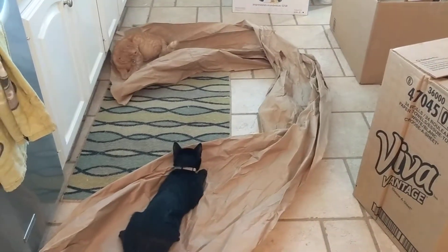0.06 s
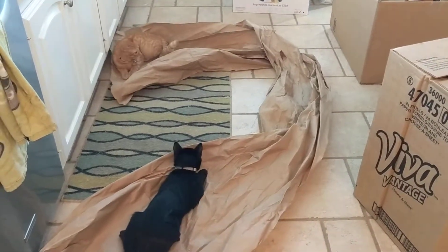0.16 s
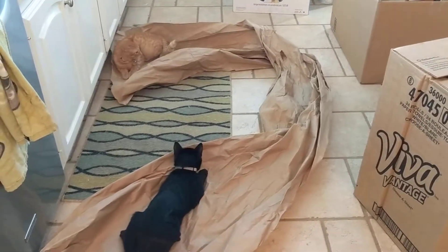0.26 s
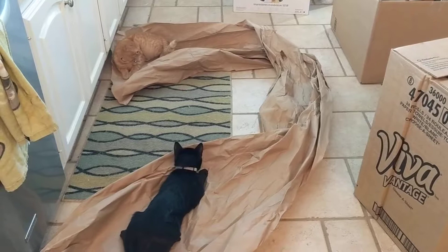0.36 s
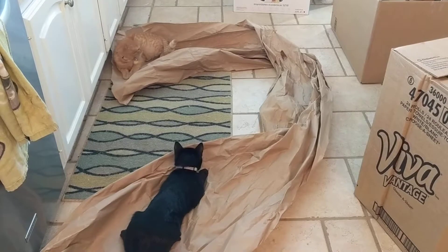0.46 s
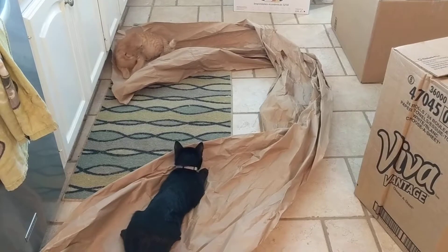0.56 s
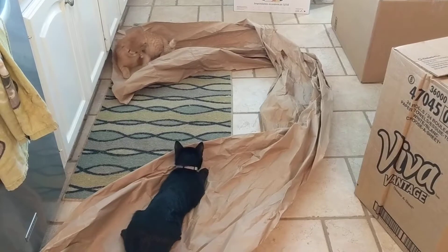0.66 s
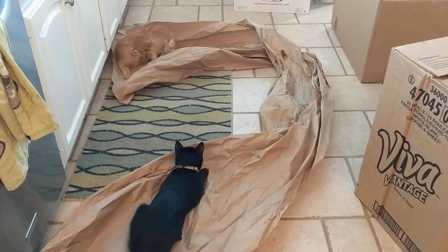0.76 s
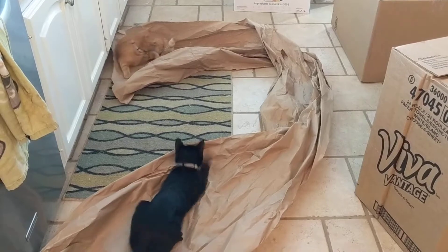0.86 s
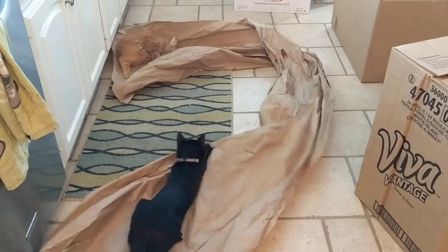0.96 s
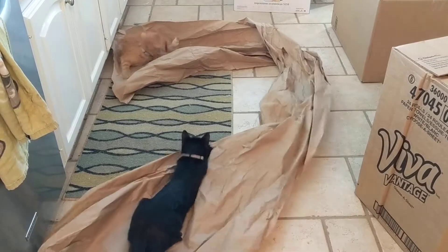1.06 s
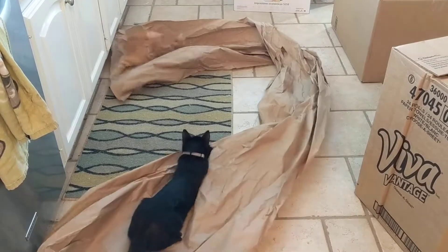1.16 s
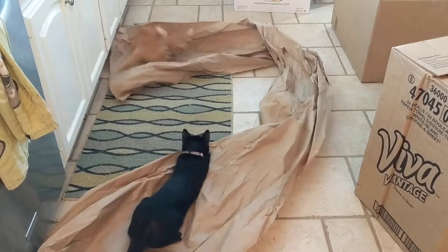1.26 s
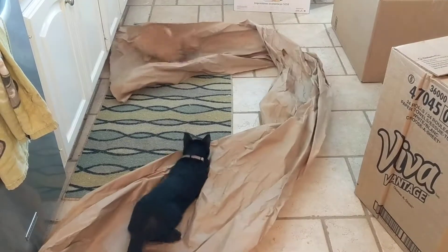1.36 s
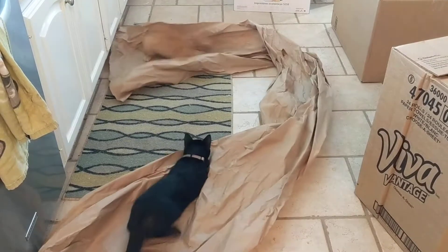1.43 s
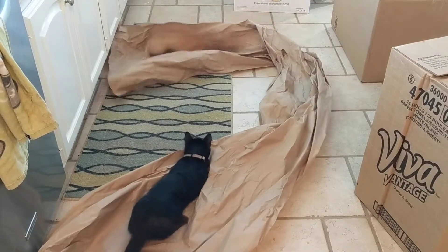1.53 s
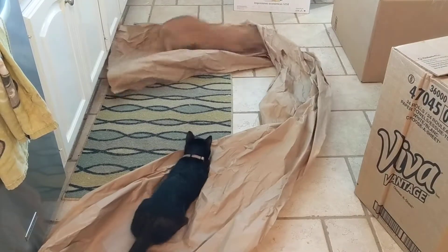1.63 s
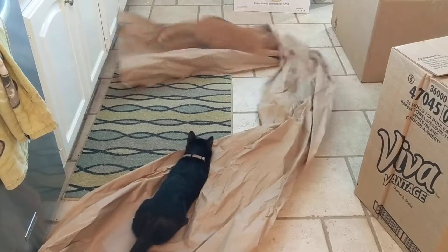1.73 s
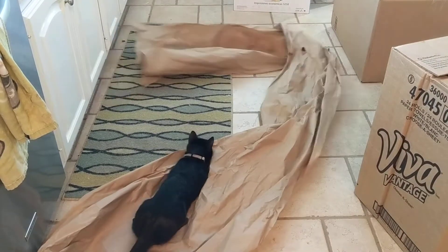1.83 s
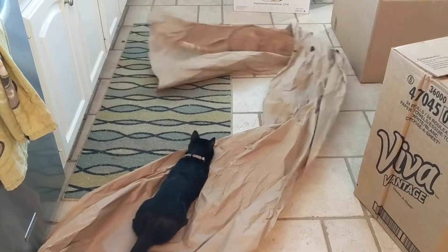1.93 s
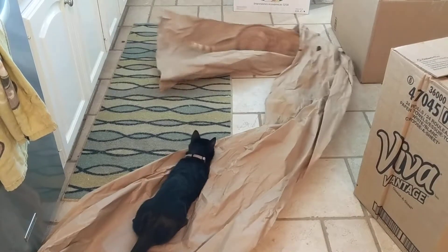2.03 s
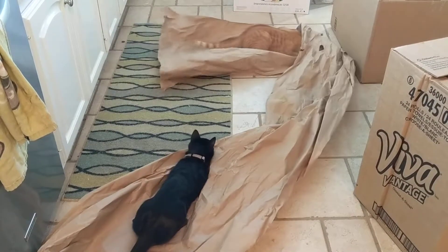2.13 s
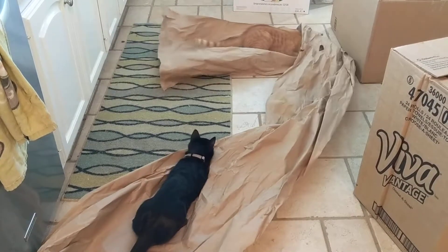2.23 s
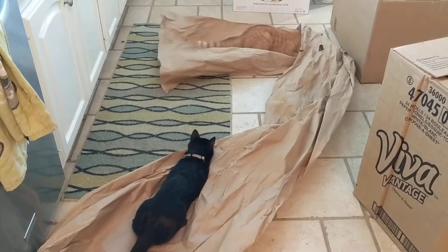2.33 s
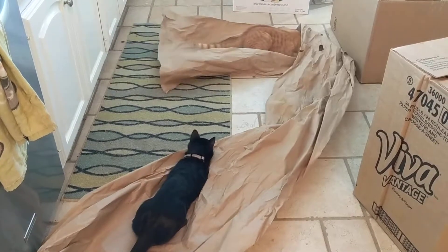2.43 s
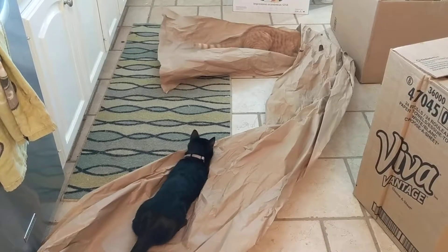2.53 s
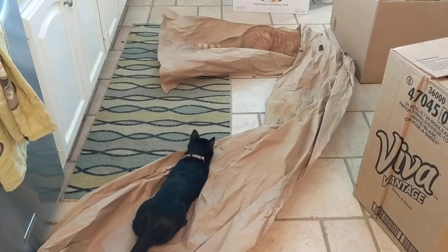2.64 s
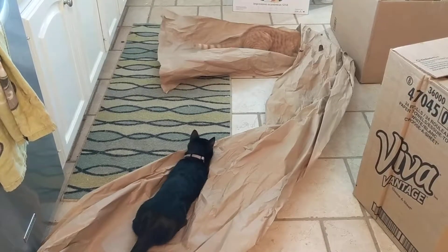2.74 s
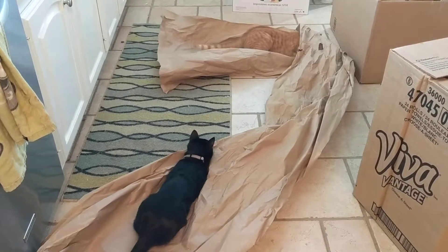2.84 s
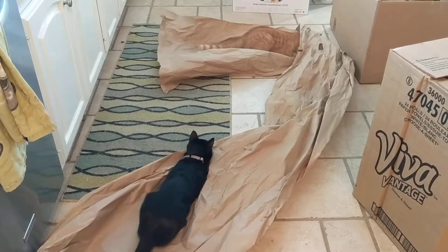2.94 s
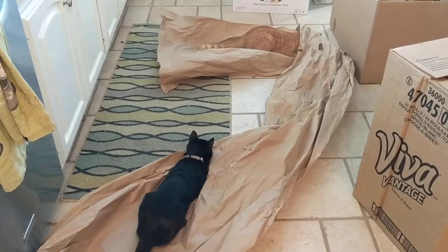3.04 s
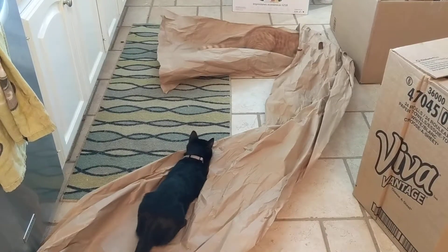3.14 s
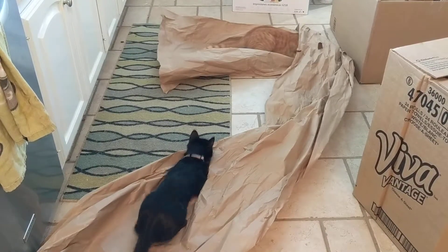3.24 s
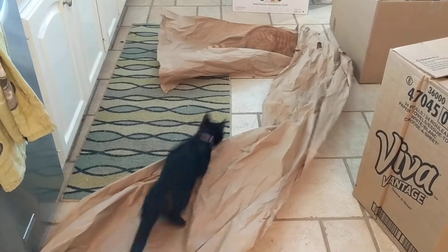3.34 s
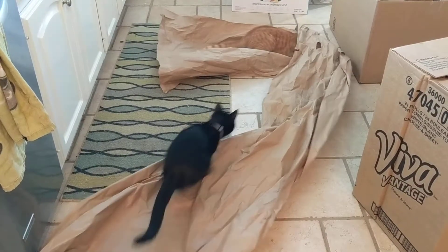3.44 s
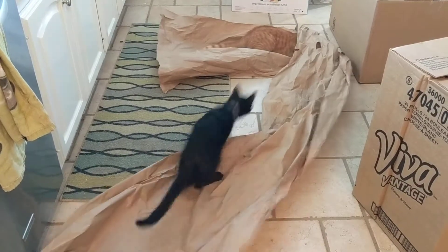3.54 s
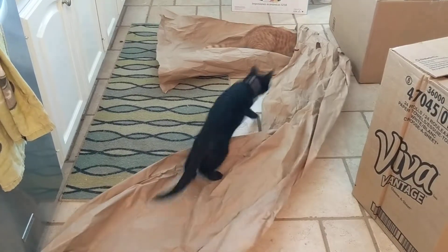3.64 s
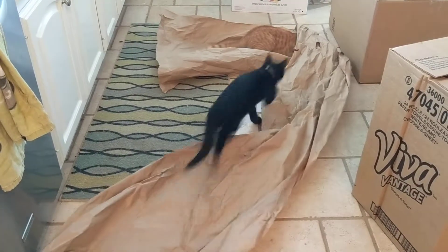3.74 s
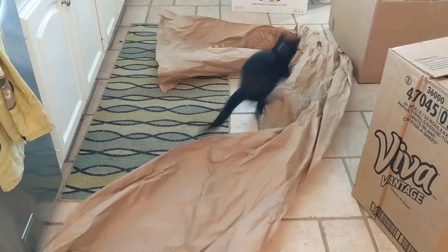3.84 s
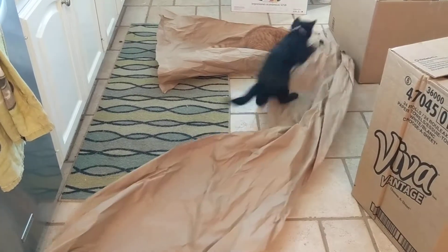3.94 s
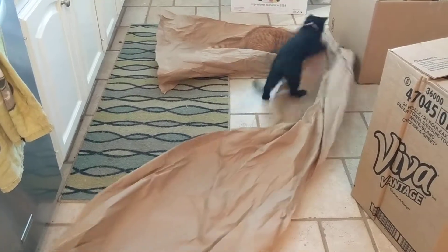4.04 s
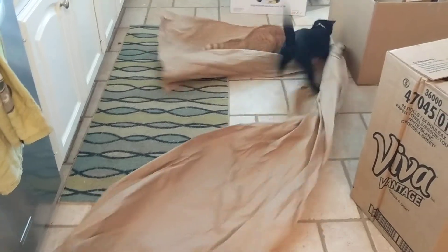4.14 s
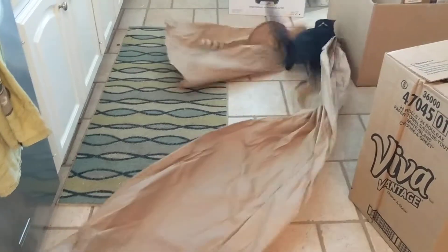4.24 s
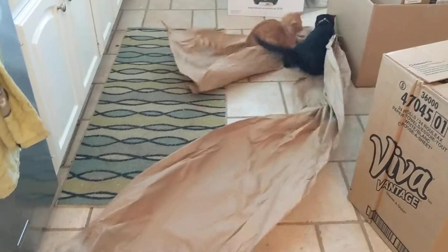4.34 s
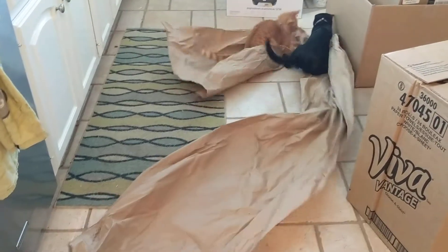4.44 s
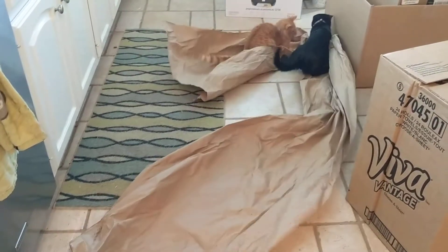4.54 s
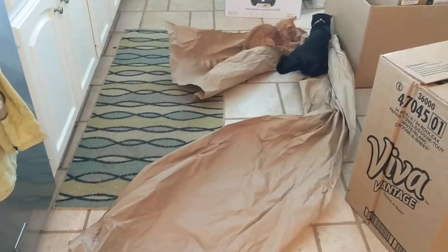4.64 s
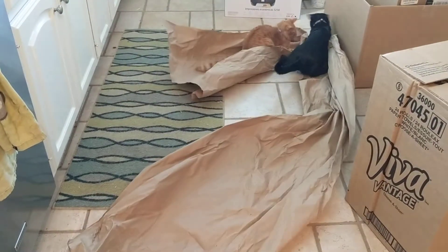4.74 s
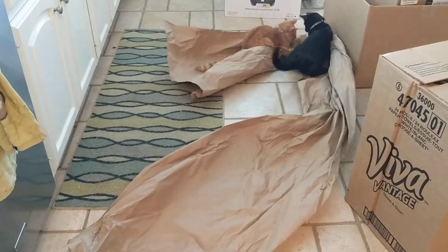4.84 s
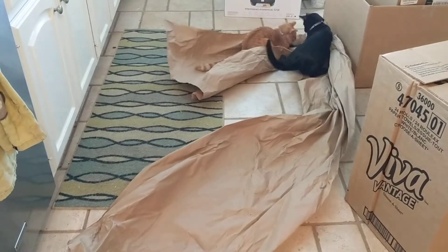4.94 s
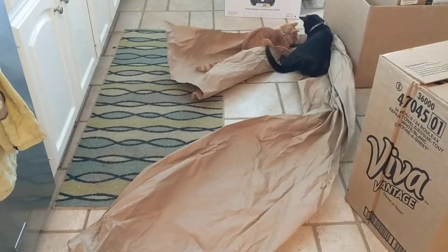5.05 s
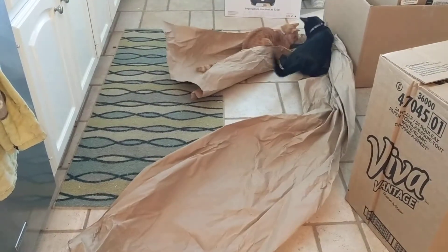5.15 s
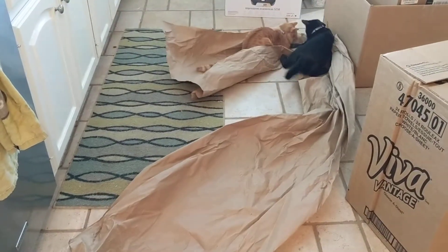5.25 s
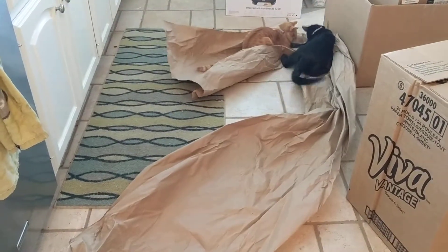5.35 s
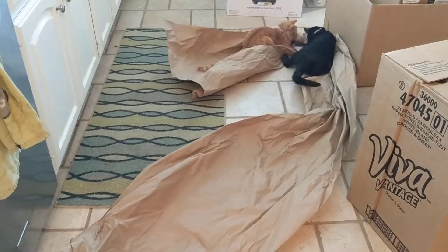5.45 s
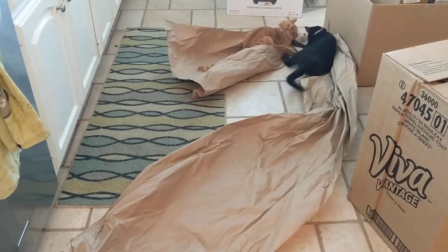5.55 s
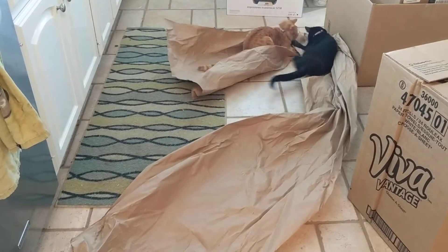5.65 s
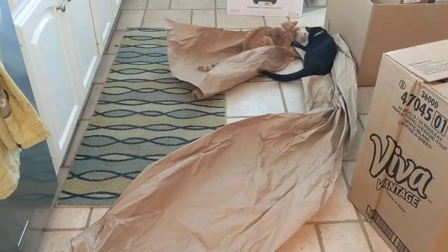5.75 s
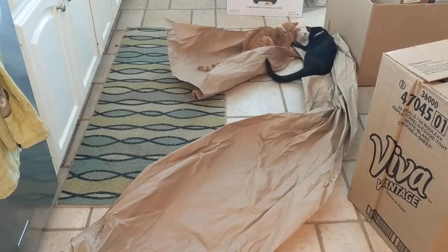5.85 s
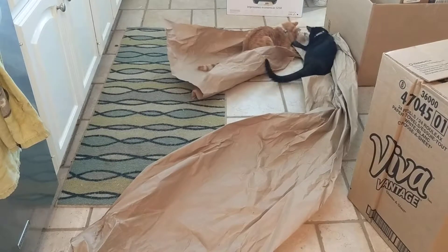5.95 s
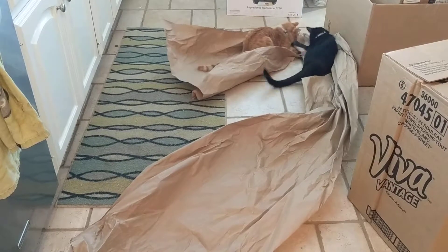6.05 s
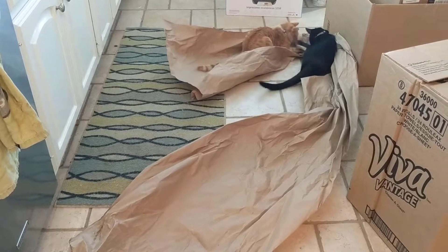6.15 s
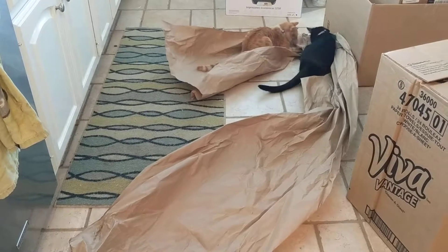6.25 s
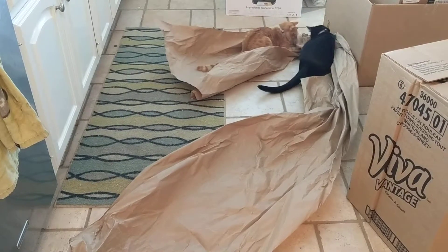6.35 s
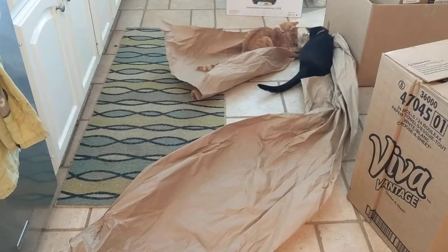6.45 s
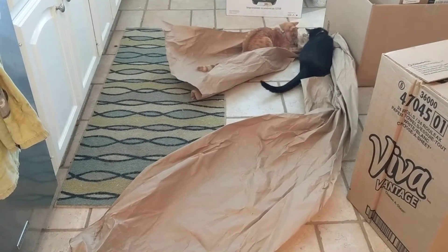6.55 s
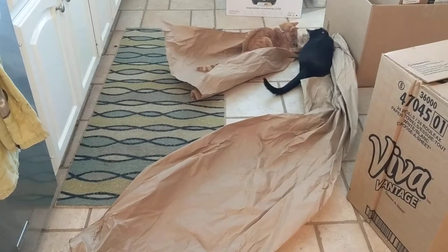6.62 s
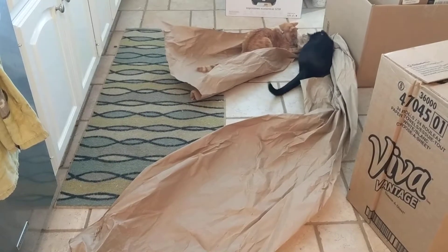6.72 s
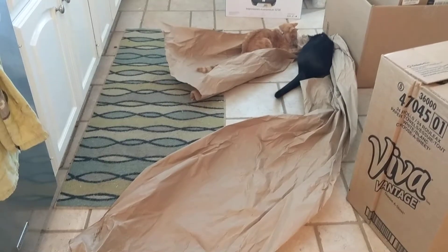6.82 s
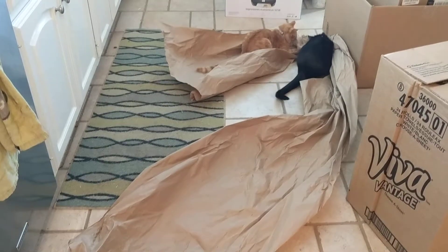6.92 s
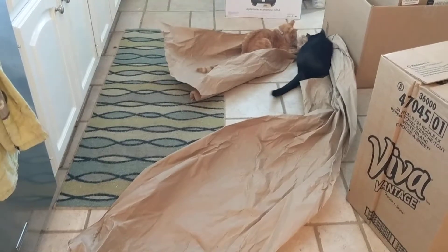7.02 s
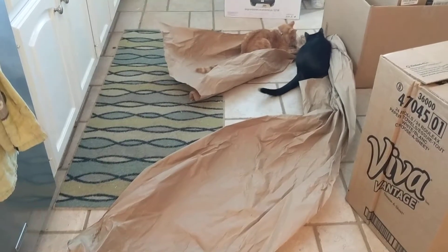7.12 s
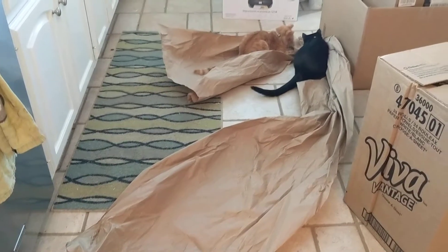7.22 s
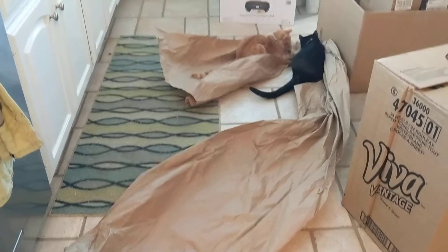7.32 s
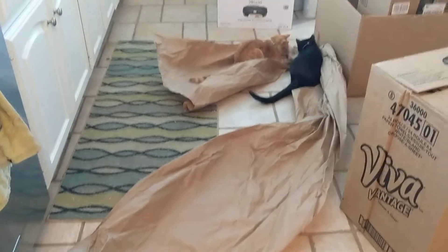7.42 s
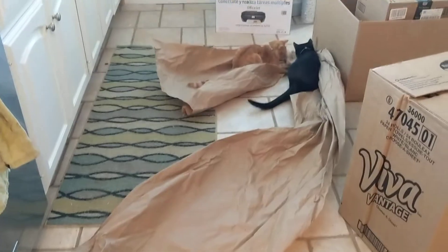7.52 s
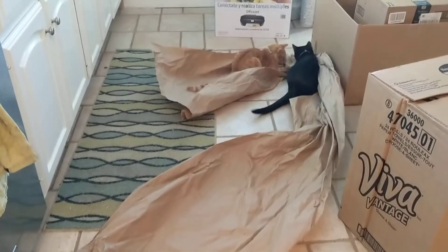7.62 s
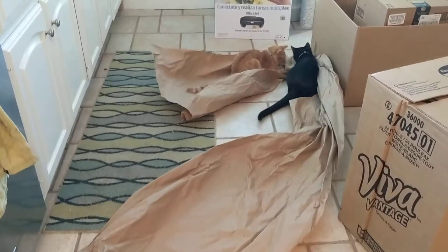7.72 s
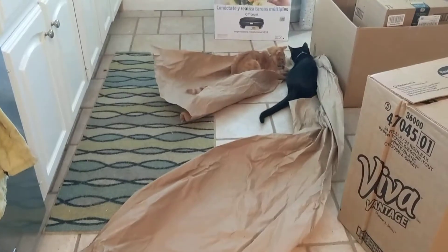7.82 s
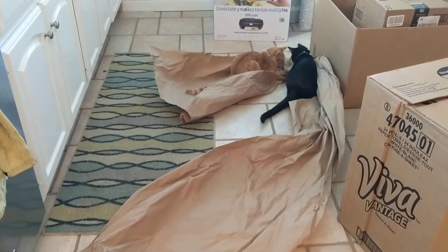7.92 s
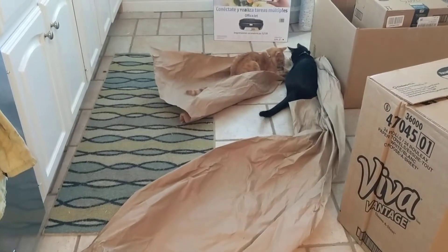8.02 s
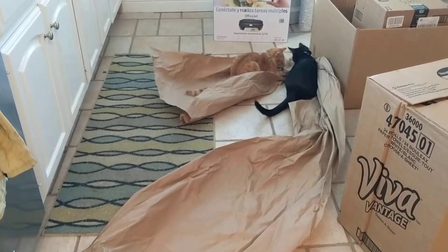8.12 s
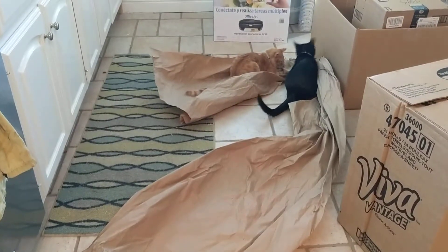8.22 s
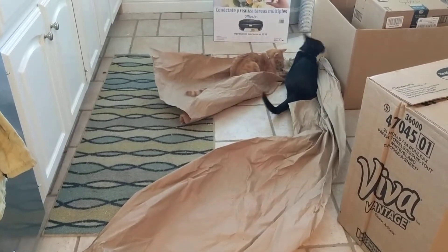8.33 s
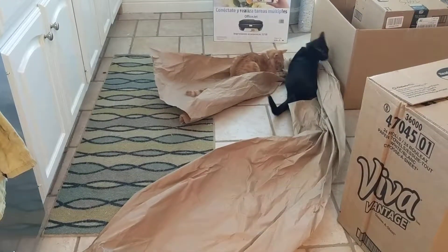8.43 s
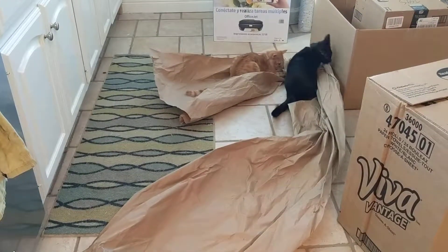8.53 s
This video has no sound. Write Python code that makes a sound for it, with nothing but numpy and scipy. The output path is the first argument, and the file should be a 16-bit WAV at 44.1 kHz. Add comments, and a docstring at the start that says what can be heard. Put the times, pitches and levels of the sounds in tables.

```python
"""A tiled kitchen: two cats pounce and scramble on a long sheet of stiff packing paper.
Creases crackle as swarms of tiny ragged clicks; single folds snap and set off dying runs of smaller ones.
Collar bells tinkle faintly as clusters of short high tones, and paws land as soft low thuds.
An appliance hums behind, built from wavering tones and shaped noise.
Random echoes make the room, and the small microphone adds a sharp treble peak and hiss."""
import sys
import numpy as np
from scipy import signal
from scipy.fft import rfft, irfft
from scipy.io import wavfile

SR = 44100
rng = np.random.default_rng(int(sys.argv[2]) if len(sys.argv) > 2 else 0)


def transcribe(u):
    """Save the signal u as a 16-bit wav file named by the first command-line argument.

    u: samples, shape (n,) or (channels, n), limited to [-1, 1]; the rate is SR.
    q: integer samples, one column per channel.
    """
    v = np.clip(np.atleast_2d(u).T, -1, 1)
    q = np.round(v * 32767).astype(np.int16)
    wavfile.write(sys.argv[1], SR, q)


N = 378378
TIME = np.arange(N) / SR


def amp(db):
    """Decibels to gain."""
    return 10 ** (np.asarray(db) / 20)


def evened(x):
    """Scales to rms 1."""
    return x / np.sqrt(np.mean(x ** 2) + 1e-20)


def read(points, hz):
    """Reads a curve of (frequency, value) points on a log-frequency axis."""
    point_hz, value = np.transpose(points)
    return np.interp(np.log(hz + 1), np.log(point_hz), value)


def add(mix, start_s, sound):
    """Mixes a sound in at its start time."""
    part = mix[max(round(start_s * SR), 0):][:len(sound)]
    part += sound[:len(part)]


def colour(x, points, size=4096):
    """Causal minimum-phase filter with the given spectrum, so clicks keep their sharp fronts."""
    hz = abs(np.fft.fftfreq(size, 1 / SR))
    log_gain = np.log(amp(read(points, hz)))
    taps = np.fft.ifft(np.exp(np.conj(signal.hilbert(log_gain)))).real
    return signal.oaconvolve(x, taps[:size // 2])[:len(x)]


def drift(below_hz):
    """Slow random wander of rms 1, holding only frequencies below the limit."""
    keep = np.fft.rfftfreq(N, 1 / SR) < below_hz
    return evened(irfft(rfft(rng.standard_normal(N)) * keep, N))


# Overtones of the appliance: pitch_hz, level_db (rms)
HUM_LINES = [(118.4, -67.5), (172.3, -72), (231, -73.5), (299, -73), (360.7, -71), (425.3, -78)]
# Tone of the rushing air: frequency_hz, gain_db
AIR_SPECTRUM = [(20, -44), (32, -11), (45, -0.5), (80, -0.5), (130, -1), (200, -3.5), (360, -5),
                (500, -9.5), (1000, -11.5), (2100, -14), (3200, -23), (6000, -28.5), (16000, -37.5)]


def appliance(motor_hz=53.2, motor_db=-54, air_db=-60):
    """A motor's deep drone, its weak wavering overtones and a rush of air."""
    drone_gain = amp(motor_db + .5 * drift(7.9))
    drone = drone_gain * np.sin(2 * np.pi * motor_hz * TIME + .1 * drift(2.5))
    lines = np.zeros(N)
    for hz, db in HUM_LINES:
        line_gain = amp(db + 2 * drift(4.4))
        lines += line_gain * np.sin(2 * np.pi * hz * TIME + 0.89 * drift(4))
    air = evened(colour(rng.standard_normal(N), AIR_SPECTRUM))
    return np.sqrt(2) * (drone + lines) + amp(air_db) * air  # root 2 makes tone levels rms


# Cats shove the paper: start_s, rise_s, hold_s, crackle_level_db, broad_folds_relative_to_fine_creases_db
SHOVE_CUES = [(0.006, 0.0025, 0.006, -54, 1.5), (0.053, 0.017, 0.019, -69, 4.0),
              (0.508, 0.021, 0.017, -58.5, -0.5), (0.792, 0.091, 0.096, -47.0, -5),
              (0.969, 0.046, 0.035, -32.0, -3), (1.126, 0.05, 0.076, -39.5, -2),
              (1.216, 0.04, 0.12, -37.5, -0.5), (1.428, 0.085, 0.16, -47.5, -0.5),
              (1.669, 0.04, 0.1, -34.5, -2.5), (1.782, 0.11, 0.01, -33.5, -4),
              (1.914, 0.051, 0.12, -40.5, -5), (2.09, 0.054, 0.074, -49.5, -1),
              (2.257, 0.039, 0.11, -65.5, 12.5), (2.782, 0.069, 0.048, -57.0, 4.5),
              (2.891, 0.049, 0.025, -49, -1.5), (2.999, 0.079, 0.157, -58, -0.5),
              (3.233, 0.062, 0.028, -53.5, 5.5), (3.31, 0.047, 0.034, -39.5, -2),
              (3.417, 0.033, 0.054, -51.5, -1), (3.513, 0.028, 0.017, -37, 1.0),
              (3.681, 0.15, 0.109, -47.5, -2), (3.896, 0.07, 0.015, -34, -5.0),
              (3.97, 0.023, 0.011, -34, -6.5), (4.057, 0.038, 0.094, -32, -6.5),
              (4.194, 0.052, 0.023, -30.5, -3.5), (4.302, 0.048, 0.19, -37.5, -4.5),
              (4.65, 0.041, 0.12, -59.5, 4), (4.803, 0.12, 0.0087, -34.5, -2.5),
              (5.044, 0.11, 0.077, -46.0, -0.5), (5.273, 0.045, 0.048, -52, 1.5),
              (5.368, 0.12, 0.15, -47, -1.5), (5.635, 0.058, 0.026, -44.5, -2.0),
              (5.743, 0.033, 0.065, -52, -1.5), (5.992, 0.22, 0.05, -42, -1.5),
              (6.269, 0.037, 0.042, -51, 0.5), (6.351, 0.099, 0.022, -45.5, 0.5),
              (6.663, 0.02, 0.013, -58, 5), (6.752, 0.021, 0.011, -52.5, -3.5),
              (6.995, 0.027, 0.005, -55, 2.5), (7.087, 0.038, 0.19, -62, -1.5),
              (7.307, 0.024, 0.025, -54.5, 5), (7.351, 0.029, 0.014, -51.0, -4),
              (7.715, 0.042, 0.022, -57.0, 2.0), (7.785, 0.056, 0.224, -62.5, 0),
              (8.13, 0.19, 0.24, -63.5, -1.5), (8.538, 0.031, 0.01, -53.0, -10)]


def effort(release_s=0.046, settle_db=-15, settle_s=.16, settle_broad_db=1.5):
    """Drives fine creases and broad folds in dB: a shove swells, holds and lets go, then the sheet relaxes."""
    fine, broad = np.full((2, N), 1e-9)  # power floor
    t = TIME[:SR]
    for start_s, rise_s, hold_s, db, broad_db in SHOVE_CUES:
        swell = np.sin(np.pi / 2 * np.minimum(t / max(rise_s, 1e-3), 1)) ** 2
        after = np.maximum(t - rise_s - hold_s, 0)
        push = swell * np.exp(-after / release_s)
        settle = swell * amp(settle_db) * np.exp(-after / settle_s)
        broad_settle = amp(settle_broad_db) * settle  # broad folds settle louder
        add(fine, start_s, amp(db) ** 2 * (push ** 2 + settle ** 2))
        add(broad, start_s, amp(db + broad_db) ** 2 * (push ** 2 + broad_settle ** 2))
    return 10 * np.log10(fine), 10 * np.log10(broad)


def facet(hz, cycles, rough, size=700):
    """One facet of paper flips: a few ragged cycles that die at once; energy 1."""
    t = np.arange(size) / SR
    grit = signal.lfilter([1], [1, -np.exp(-2 * np.pi * hz / SR)], rng.standard_normal(size))
    wave = np.sin(2 * np.pi * hz * t) + rough * evened(grit)
    wave = wave * np.exp(-t * hz / cycles)
    return wave / np.linalg.norm(wave)


def swarm(level_db, low_hz, high_hz, per_s, spread_db, crowding, cycles, count=44):
    """Facets of many sizes flip at random; harder work flips more of them, and louder."""
    rate = per_s * amp(crowding * (level_db - level_db.max()))  # flips per second
    strengths = amp(spread_db * np.minimum(rng.exponential(1, N), 3))
    clicks = (rng.random(N) < rate / SR) * strengths
    # neighbours share the stored strain, so crowded clicks are each weaker
    window = signal.windows.hann(int(0.055 * SR))
    power = abs(signal.oaconvolve(clicks ** 2, window / window.sum(), "same"))
    clicks = clicks * rng.choice([-1, 1], N) * amp(level_db) / np.sqrt(power + 1e-4)
    kind = rng.integers(0, count, N)
    out = np.zeros(N)
    for k, hz in enumerate(np.linspace(low_hz, high_hz, count)):
        out += signal.oaconvolve(clicks * (kind == k), facet(hz, cycles, rough=0.79))[:N]
    return out


def crumple(fine_db, folds_db):
    """Fine creases crackle and broad folds rustle as the cats shift the sheet."""
    slip_db = 0.72 * drift(14)  # the sheet gives way unevenly
    creases = swarm(fine_db + slip_db - 4.5, low_hz=3020, high_hz=11000, per_s=2100,
                    spread_db=2.0, crowding=.38, cycles=2.12)
    folds = swarm(folds_db + slip_db - 5.5, low_hz=278, high_hz=2700, per_s=1400,
                  spread_db=3.5, crowding=.4, cycles=2.37)
    return creases + folds


def pop(hz, ring_s, crack_s=0.00072, ring_db=-9, upper_db=-3, size=4000):
    """A crack runs along a crease and the taut panel beside it rings in two modes; energy 1."""
    t = np.arange(size) / SR
    burst = rng.standard_normal(size) * t * np.exp(-t / crack_s)
    crack = signal.oaconvolve(burst, facet(hz, cycles=1.0, rough=0.66))[:size]
    # a small panel radiates little bass
    crack = signal.lfilter(*signal.butter(1, min(hz / 3, 8000), "high", fs=SR), crack)
    fade = np.exp(-t / max(ring_s, 2e-4))
    lower = np.sin(2 * np.pi * hz * t) * fade
    upper_hz = hz * rng.uniform(1.6, 2.2)
    upper = amp(upper_db) * np.sin(2 * np.pi * upper_hz * t) * fade ** 3  # dies sooner
    wave = crack / abs(crack).max() + amp(ring_db) * (lower + upper)
    return wave / np.linalg.norm(wave)


# Folds snap and set off smaller ones: start_s, level_db (energy, before gain), pitch_hz, run_relative_to_snap_db
SNAP_CUES = [(0.0522, -28.5, 3360, -0.5), (.525, -39.5, 2900, 5), (0.7473, -37, 2450, 3),
             (.8535, -32, 5800, 3.5), (0.923, -22, 5080, 3.5), (.987, -12.5, 7240, 2),
             (1.0188, -14, 5230, 6.5), (1.3328, -18, 4670, -5.5), (1.704, -13.5, 6800, 7.5),
             (2.1473, -13.5, 8370, -17), (2.302, -30, 4100, 5), (2.5396, -36, 1860, -1),
             (2.652, -42.5, 4520, -2), (2.9098, -27, 6100, 5.5), (3.0746, -27, 4070, -10),
             (3.1683, -28.5, 4240, -0.5), (3.3118, -24, 6000, -12), (3.332, -19, 4750, -3),
             (3.5272, -19.5, 2300, 1), (3.5435, -14, 4140, -1.5), (3.579, -16.5, 5200, -12),
             (3.709, -15, 7340, -8), (3.7786, -21.5, 6250, -1), (3.9229, -14, 6300, 6),
             (3.928, -5, 7930, -0.5), (3.9938, -9, 6900, 0), (4.1658, -18, 5840, -6.5),
             (4.238, -12.5, 6700, 0), (4.35, -10, 6700, 0), (4.7386, -31, 3800, -10),
             (4.824, -27, 4600, 6.5), (5.0617, -23, 4670, -13.5), (5.1638, -20, 4300, -2),
             (5.3135, -24.5, 4900, 5), (5.4377, -28.5, 5100, 3), (6.062, -34, 4220, 2),
             (6.0933, -23, 4230, -9), (6.4408, -19.5, 4300, -0.5), (6.679, -26, 4200, -8),
             (6.7602, -31.5, 3260, 8), (6.8839, -32.5, 4260, 0), (7.0118, -35, 2140, 3),
             (7.138, -30, 2700, -4), (7.2426, -30.5, 1650, 1), (7.743, -37.5, 2620, 6),
             (7.861, -33, 7700, 2), (8.0476, -27.5, 4400, -10), (8.3276, -22, 8030, -4),
             (8.4793, -26.5, 4420, -11), (8.5649, -30, 8600, -9)]
PRESSED_DB = -42  # around this crackle level the paws begin to press on the panels and damp them
RING_S, RING_HZ = 0.0026, 4000  # freedom adds this much ring at this pitch; lower panels gain more


def snaps(work_db, gain_db=1, run_gain_db=1, run_per_s=1100, run_s=0.013, pressed_ring_s=0.0017, size=6000):
    """A stiff fold pops through; the strain it sheds flips its neighbours in a dying run."""
    pops, runs, t = np.zeros(N), np.zeros(N), np.arange(size) / SR
    for start_s, db, hz, run_db in SNAP_CUES:
        flips = (rng.random(size) < run_per_s / SR) * rng.standard_normal(size)
        run = signal.oaconvolve(flips * np.exp(-t / run_s), facet(hz, cycles=0.44, rough=0.65))
        run = run / (np.linalg.norm(run) + 1e-9)
        free = 1 / (1 + amp(np.interp(start_s, TIME, work_db) - PRESSED_DB))  # 1 is undamped
        ring_s = pressed_ring_s + free * RING_S * RING_HZ / hz
        add(pops, start_s, amp(db + gain_db) * pop(hz, ring_s))
        add(runs, start_s + .002, amp(db + run_gain_db + run_db) * run)
    return pops, runs


# Tone of the crackling sheet: frequency_hz, gain_db
PAPER_SPECTRUM = [(60, -20), (130, -8), (250, -4), (600, -3), (900, 0.5), (2000, 2), (3200, 0.5), (5500, 2),
                  (9000, 2), (16000, -1.5)]


def paper_tone(x):
    """The sheet favours some frequencies as it radiates crackle."""
    return colour(x, PAPER_SPECTRUM)


# Collar bells: start_s, level_db (before gain), pitch_hz
BELL_CUES = [(.10, -53, 11000), (.655, -62, 11000), (1.39, -33.5, 10950), (1.581, -37.5, 10950),
             (2.26, -39, 11000), (3.606, -31, 11250), (3.71, -46, 11000), (3.821, -30, 11150),
             (4.96, -44, 11200), (5.049, -39.5, 11050), (5.18, -43, 11000), (5.31, -42.5, 11000)]


def bells(decay_s=0.014, rattle_s=.05, gain_db=-11, size=7000):
    """A pellet rattles in a tiny bell, ringing a close pair of modes and a weaker one above."""
    out, t = np.zeros(N), np.arange(size) / SR
    modes = [(.992, 0), (1.008, -2), (1.09, -19)]  # pitch ratio, level dB
    for start_s, db, hz in BELL_CUES:
        ring = sum(amp(mode_db) * np.sin(2 * np.pi * hz * ratio * t) for ratio, mode_db in modes)
        ring = ring * np.exp(-t / decay_s)
        for delay_s in rattle_s * rng.random(size=7) ** 2:  # strikes bunch early
            add(out, start_s + delay_s, amp(db + gain_db) * ring / 2)
    return out


# Paws land on the floor: start_s, level_db (before gain), pitch_hz
PAW_CUES = [(0.878, -39.5, 107.3), (1.029, -57, 179), (1.268, -44, 131), (1.749, -51, 88),
            (1.863, -37.5, 194), (3.56, -45, 98), (3.947, -41.5, 124), (4.008, -50, 89), (4.19, -45.5, 238)]


def paws(decay_s=0.02, gain_db=-3, size=9000):
    """Soft, low thuds through paper on the floor: two decaying tones with a rounded onset."""
    out, t = np.zeros(N), np.arange(size) / SR
    envelope = np.exp(-t / decay_s) * (1 - np.exp(-t / 0.0045))
    for start_s, db, hz in PAW_CUES:
        second_hz = hz * rng.uniform(0.62, 1.61)
        thud = np.sin(2 * np.pi * hz * t) + 0.34 * np.sin(2 * np.pi * second_hz * t)
        add(out, start_s, amp(db + gain_db) * thud * envelope)
    return out


# Reverberation of the kitchen: frequency_hz, t60_s
ROOM_DECAY = [(150, 0.39), (1000, 0.34), (4000, 0.43), (8000, 0.25), (15000, 0.084)]


def echoes(wet_db=-1, early_db=-5, early_s=0.0076):
    """From one spot: quick bounces off tiles and boxes, then a short diffuse tail."""
    t = np.arange(SR // 2) / SR
    taps = rng.standard_normal(len(t)) * (rng.random(len(t)) < .12) * (t > .004)
    hz, at_s, bands = signal.stft(taps, SR, nperseg=256)
    fade = amp(-60 * at_s / read(ROOM_DECAY, hz)[:, None])  # each band dies at its own rate
    tail = signal.istft(bands * fade, SR, nperseg=256)[1][:len(t)]
    early = rng.standard_normal(len(t)) * (rng.random(len(t)) < .02)
    early = early * np.exp(-t / early_s) * (t > .001)
    return amp(wet_db) * tail / np.linalg.norm(tail) + amp(early_db) * early / np.linalg.norm(early)


def kitchen(x, count=12):
    """The room's answer: sound comes from spots all over the sheet, each with its own echoes."""
    spot = TIME * 130  # crossfades through the spots in turn, 130 a second
    out = np.zeros(N)
    for k in range(count):
        share = np.cos(np.pi / 2 * np.minimum(abs((spot - k) % count - count / 2), 1))
        out += signal.oaconvolve(x * share, echoes())[:N]
    return out


def scene(pop_room_db=-3):
    """Paper, paws and bells sound in the kitchen over the hum."""
    fine_db, folds_db = effort()
    pops, runs = snaps(fine_db)
    play = paper_tone(crumple(fine_db, folds_db) + runs) + paws() + bells()
    # a popping panel throws its sound forward, so it is drier
    room = kitchen(play + amp(pop_room_db) * pops)
    return (play + pops + room + appliance())[None]


# Microphone response with its port resonance: frequency_hz, gain_db
MIC_RESPONSE = [(5500, 0), (6800, 2), (7700, 6.5), (8250, 9.5), (8800, 2), (9500, -3.5), (11000, -10),
                (13500, -11), (15500, -11.5)]


def record(dry):
    """The microphone's port resonance, its own hiss, and the band limit."""
    heard = colour(dry[0], MIC_RESPONSE) + amp(-78) * rng.standard_normal(N)
    band_limit = signal.firwin(511, 15850, window=("kaiser", 9), fs=SR)  # low-pass, Hz
    return signal.oaconvolve(heard, band_limit, "same")[None]


dry = scene()
out = record(dry)
transcribe(out)
```